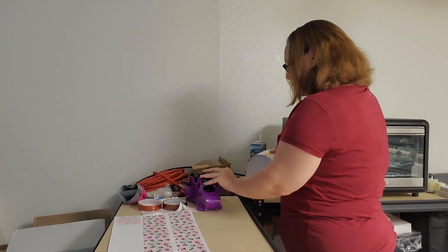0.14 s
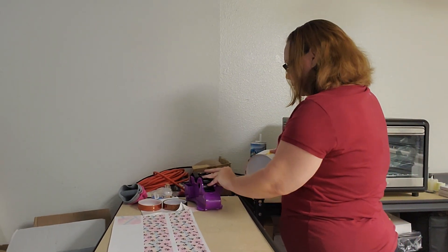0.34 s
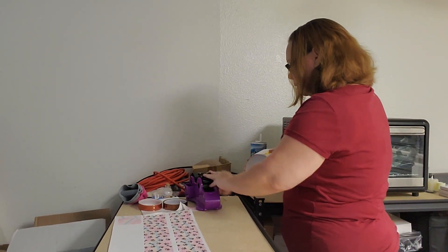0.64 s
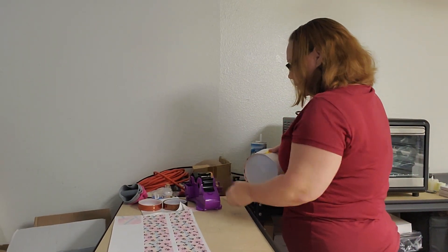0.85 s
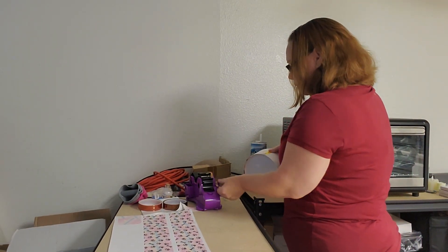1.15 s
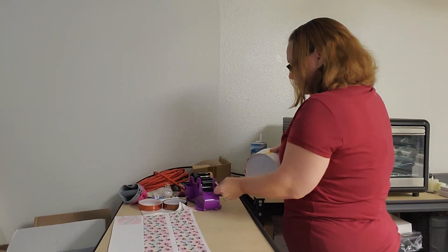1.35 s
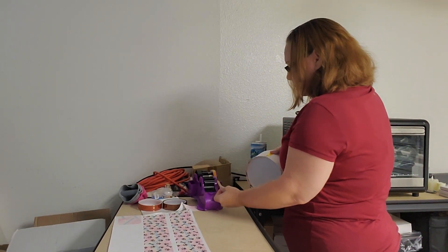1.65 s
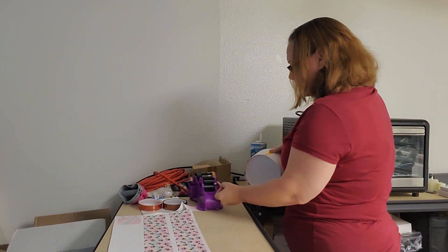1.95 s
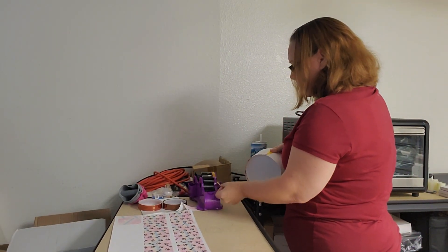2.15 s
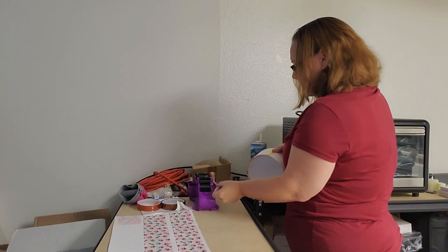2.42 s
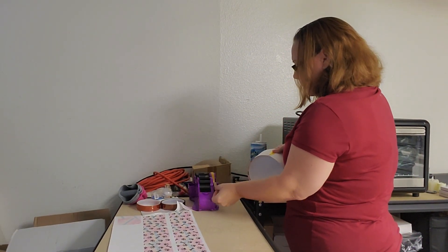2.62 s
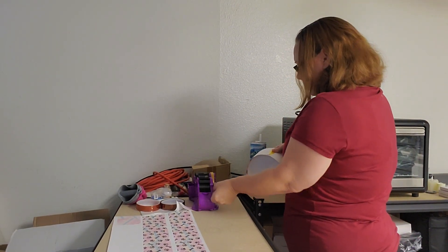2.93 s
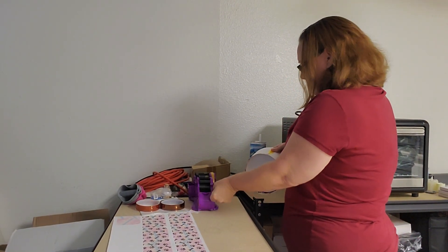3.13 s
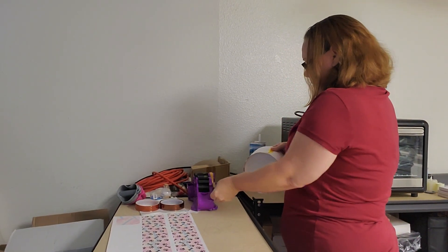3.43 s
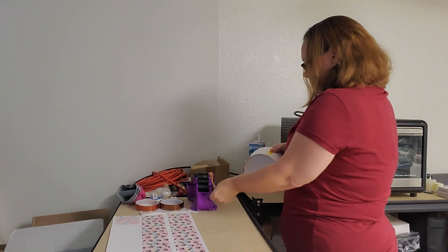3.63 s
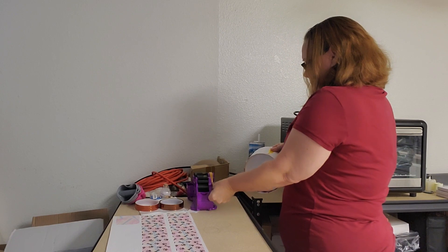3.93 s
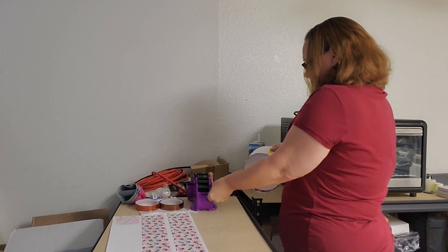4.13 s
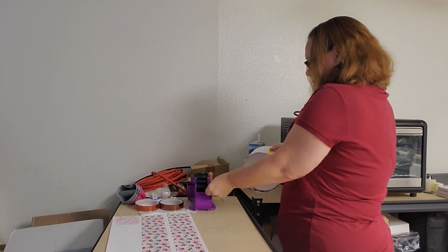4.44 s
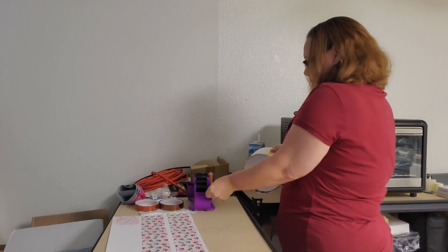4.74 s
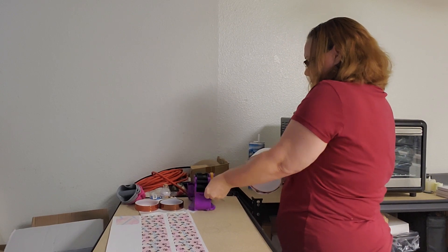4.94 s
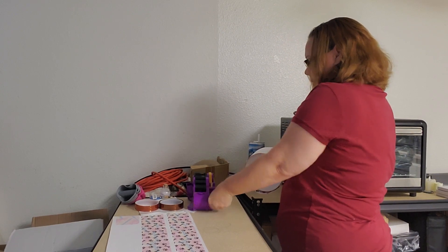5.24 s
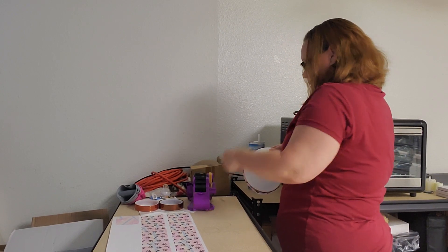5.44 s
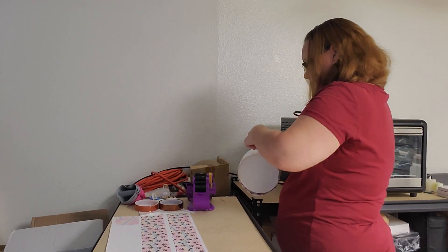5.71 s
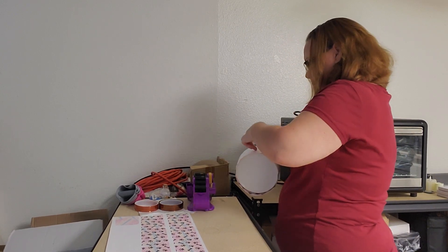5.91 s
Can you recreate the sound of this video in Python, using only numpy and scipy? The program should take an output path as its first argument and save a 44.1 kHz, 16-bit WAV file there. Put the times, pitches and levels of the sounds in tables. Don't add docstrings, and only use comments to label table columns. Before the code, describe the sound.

In a small hard room, a faint bowl ring fades, then tape peels with a short dry rasp, a tiny hub squeak and a quick tear. A longer, louder pull ends in a hard knock of the dispenser on the table. Soft handling ticks and paper rubs follow, then a crackling tear with sharp clicks. Phone microphone a couple of metres away; low hum and faint hiss.

```python
import sys
import numpy as np
from scipy import signal
from scipy.fft import rfft, irfft
from scipy.io import wavfile
from scipy.ndimage import uniform_filter1d

SR = 44100
rng = np.random.default_rng(int(sys.argv[2]) if len(sys.argv) > 2 else 0)


def linear_from_db(decibels):
    return 10 ** (np.asarray(decibels, float) / 20)


def dump(signal):
    limited = np.clip(np.atleast_2d(signal).T, -1, 1)
    pcm = np.round(limited * 32767).astype(np.int16)
    wavfile.write(sys.argv[1], SR, pcm)


N = 267854
HZ = np.fft.rfftfreq(270000, 1 / SR) + 1


def on_log(table, hz):
    f, value = np.array(table)[:, 0], np.array(table)[:, 1]
    return np.interp(np.log(hz), np.log(f), value)


def causal(gain):
    fold = irfft(np.log(gain + 1e-9))
    half = len(fold) // 2
    fold[1:half] *= 2
    fold[half + 1:] = 0
    return np.exp(rfft(fold))


def shape(x, gain):
    return irfft(rfft(x, 2 * len(HZ) - 2) * gain)[..., :N]


def unit(x):
    return x / np.sqrt(np.mean(x ** 2))


def bell(hz, centre_hz, width_hz):
    return 1 / np.sqrt(1 + ((hz ** 2 - centre_hz ** 2) / (hz * width_hz)) ** 2)


def split(hz, *edges_hz):
    below = [0 * hz] + [1 / (1 + (hz / edge) ** 6) for edge in edges_hz] + [1 + 0 * hz]
    return np.sqrt(np.diff(below, axis=0))


def walk(rate):
    hold = int(SR / rate)
    levels = rng.standard_normal(size=4096)
    steps = np.repeat(levels[:N // hold + 1], hold)
    return unit(uniform_filter1d(uniform_filter1d(steps, hold), hold)[:N])


def pan(x, db):
    return x * linear_from_db(np.array([[db], [-db]]) / 2)


# f/Hz, side minus mid level/dB
SIDE_SHARE = [(40, -9), (250, -10), (600, -3.5), (2000, 0), (5000, 0), (15000, 0)]


def ports(mid, side):
    return mid + shape(side, linear_from_db(on_log(SIDE_SHARE, HZ))) * np.array([[1], [-1]])


# f/Hz, rms level/dB
HUM = [(48.4, -59.5), (118.4, -67), (172.3, -82), (220.7, -79.5)]
# f/Hz, level per Hz/dB
FLOOR = [(25, -20.5), (45, -3.5), (75, 6), (110, -3.5), (160, -13), (230, -7.5), (320, -19.5), (500, -20.5),
         (800, -30.5), (1500, -36.5), (4000, -40), (8000, -50.5), (13000, -42.5), (16000, -40)]
FLOOR_DB = -63.5


def background():
    t = np.arange(N) / SR
    hum = 0
    for hz, db in HUM:
        level = linear_from_db(db + 2 + 0.36 * walk(2))
        hum = hum + level * np.sin(2 * np.pi * hz * t + 0.5 * walk(4))
    air = shape(rng.standard_normal((2, N)), linear_from_db(on_log(FLOOR, HZ)))
    return hum + linear_from_db(FLOOR_DB) * unit(ports(*air))


# f/Hz, t60/s
ROOM = [(60, 0.15), (250, 0.35), (1000, .3), (3000, 0.23), (8000, 0.3), (15000, 0.053)]
ROOM_DB = -6
TABLE_DB, TABLE_S = -5, 0.016
LATE_DB, LATE_T60_S = -32, 0.59


def room(lead_us, size=24576):
    t, hz = np.arange(size) / SR, np.fft.rfftfreq(size, 1 / SR) + 1
    noise = rfft(rng.standard_normal((2, size)))
    tail = 0
    for f in 50 * 2. ** np.arange(9):
        tail = tail + linear_from_db(-60 * t / on_log(ROOM, f)) * irfft(noise * bell(hz, f, 0.7 * f) ** 2)
    tail = unit(tail * (1 - np.exp(-t / 0.0015)))
    late = unit(irfft(noise[::-1] * bell(hz, 1000, 2000)) * linear_from_db(-60 * t / LATE_T60_S))
    bounces = rng.standard_normal((2, size)) * (rng.random((2, size)) < 0.15)
    early = unit(bounces * np.exp(-t / TABLE_S))
    answer = linear_from_db(ROOM_DB) * tail + linear_from_db(LATE_DB) * late + linear_from_db(TABLE_DB) * early
    mid, side = rfft(answer) / np.sqrt(size)
    delay_s = 8 / SR + 1e-6 * lead_us * np.array([[-0.5], [0.5]])
    direct = np.exp(-2j * np.pi * hz * delay_s)
    echo = direct + mid + side * linear_from_db(on_log(SIDE_SHARE, hz)) * np.array([[1], [-1]])
    even = uniform_filter1d(np.mean(abs(echo) ** 2, axis=0), size=110) ** -0.5
    return irfft(echo * causal(even)) * np.cos(np.pi / 2 * (t / t[-1]) ** 4) ** 2


# f/Hz, level/dB, t60/s
BOWL = [(2040, -67, 0.95), (2555, -58, .7), (2780, -64.5, 0.41), (3620, -52, 0.48), (4310, -70, 0.63),
        (5620, -59, .2)]
FADE_DB, FADE_T60_S = -51., 0.35


def bowl(size=16384):
    t, hz = np.arange(size) / SR, np.fft.rfftfreq(size, 1 / SR) + 1
    noise = rfft(rng.standard_normal((2, size)))
    ring = 0
    for f, db, t60 in BOWL:
        ring = ring + linear_from_db(db - 60 * t / t60) * unit(irfft(noise * bell(hz, f, 125.0) ** 2))
    tail = unit(irfft(noise[::-1] * (bell(hz, 7900, 12000) + 2.6 * bell(hz, 620, 350))))
    fading = ring + linear_from_db(FADE_DB - 60 * t / FADE_T60_S) * tail
    fading = fading * np.cos(np.pi / 2 * (t / t[-1]) ** 4)
    return np.pad(fading, ((0, 0), (0, N - size)))


# f/Hz, level/dB, t60/s
TINKLE = [(13450, -42, .22), (15050, -46, .2)]
TINKLE_S = 5.295


def tinkle():
    t = np.maximum(np.arange(N) / SR - TINKLE_S, 0)
    ring = 0
    for hz, db, t60 in TINKLE:
        ring = ring + linear_from_db(db - 60 * t / t60 + 3.0 * walk(150)) * np.sin(2 * np.pi * hz * t)
    return ring


# t/s, pitch f/Hz, level/dB
SQUEAK = [
    (0.505, 454.8, -46),
    (0.529, 427, -41),
    (0.549, 472.4, -45),
    (0.571, 459.6, -40),
    (0.6, 426, -58),
]
# multiple of the pitch, level/dB
SQUEAK_ORDERS = [(1, -4.5), (2, 1), (3, -16), (4, -2), (6, -11)]


def squeak():
    t, (s, hz, db) = np.arange(N) / SR, np.transpose(SQUEAK)
    pitch = np.interp(t, s, hz) * (1 + 0.012 * walk(300))
    phase = 2 * np.pi * np.cumsum(pitch) / SR
    gain = uniform_filter1d(linear_from_db(np.interp(t, s, db, -140, -140)), size=200)
    return linear_from_db(3.0) * gain * sum(linear_from_db(d) * np.sin(k * phase) for k, d in SQUEAK_ORDERS)


# t/s, peak level/dB, ring f/Hz, upper ring level/dB, crack level/dB
TICKS = [(0.449, -29.5, 2080, -16, -6), (0.744, -18, 1932, 6, -14), (0.788, -15.5, 1250, -6, -21.5),
         (1.422, -25.5, 1793, -14, -17.5), (3.004, -39.5, 2098, -8, -14.5), (3.274, -40, 1900, -3, -18),
         (3.437, -35, 1630, -14, -5.5), (3.463, -21.5, 1980, -11, -10.5), (3.585, -26.5, 1742, -4, -13.5),
         (3.731, -57, 1910, -16, -7), (4.048, -50, 1980, -9, 6), (4.514, -25, 2120, -20, -12),
         (4.581, -36, 1777, -30, -14), (5.073, -33, 1760, -22.5, -8.5), (5.13, -17, 1552, -8, -10),
         (5.185, -15, 1480, -20, -22), (5.36, -32.5, 1344, -11, -20)]
# t/s, peak level/dB, ring f/Hz, upper ring level/dB, crack level/dB
KNOCKS = [(0.199, -56.5, 769, -25, -17), (0.516, -32.5, 843, -15, -27.5), (0.849, -39.5, 690, -13, -19.5),
          (1.321, -54, 791, -10, -9), (1.507, -22.5, 1050, -13.5, -16), (1.996, -6.5, 780, -10, -19),
          (1.999, -8, 1300, -8, -25), (2.029, -16, 754, -8.5, -18.5), (2.409, -50, 833, -12, -15.5),
          (3.006, -50, 610, -20, -25), (2.935, -65, 624, -22, -19), (3.949, -70, 597, -26, -26),
          (4.16, -55, 900, -6, 0), (4.918, -52, 797, -5.5, -11), (4.939, -44, 936, -24, -15),
          (5.215, -21, 678, -13, -21.5), (5.235, -10.5, 772, -15, -19.5), (5.554, -64, 600, -9.5, -3.5),
          (5.779, -69, 759, -4, -27.5)]
# t/s, peak level/dB, ring f/Hz, upper ring level/dB, crack level/dB
BLADE_TICKS = [
    (0.338, -32.5, 1910, -16, -22),
    (3.061, -44, 1890, -11, -15),
    (4.25, -30, 1800, -9, -6),
]
TICK_UPPER_HZ, KNOCK_UPPER_HZ, BLADE_UPPER_HZ = 3110, 2500, 5900
CLICK_DB, CLICK_Q, CHATTER_MS, CLICK_BROAD_DB, THUMP_DB = -8, 9.3, 7.9, -22.5, -17.5


def clicks():
    out, size = np.zeros(N), 4096
    hz, t = np.fft.rfftfreq(size, 1 / SR) + 1, np.arange(size) / SR
    low, _, high = split(hz, 590, 3200)
    low = low * bell(hz, 190, 200) ** 2
    chatter = np.exp(-(1000 * t / CHATTER_MS) ** 3) * np.minimum(t / 0.00044, 1)
    rows = [(*row, TICK_UPPER_HZ) for row in TICKS]
    rows += [(*row, KNOCK_UPPER_HZ) for row in KNOCKS]
    rows += [(*row, BLADE_UPPER_HZ) for row in BLADE_TICKS]
    for s, db, ring_hz, upper_db, crack_db, upper_hz in rows:
        burst = rfft(rng.standard_normal(size) * chatter)
        modes = bell(hz, ring_hz, ring_hz / CLICK_Q)
        modes = modes + linear_from_db(upper_db + 2.5) * bell(hz, upper_hz, upper_hz / CLICK_Q)
        modes = modes + linear_from_db(-6.5) * bell(hz, ring_hz, 55.)
        modes = modes * hz / np.hypot(hz, ring_hz) + linear_from_db(CLICK_BROAD_DB) * bell(hz, 3600, 4000)
        parts = [irfft(burst * causal(gain)) for gain in (modes, low, high)]
        ring, thump, crack = (part / np.sqrt(np.mean(part[:440] ** 2)) for part in parts)
        thump = thump * linear_from_db(THUMP_DB) * (1000 / ring_hz) ** 2.3
        i = int(s * SR)
        out[i:i + size] += linear_from_db(db + CLICK_DB) * (ring + thump + linear_from_db(crack_db) * crack)
    return out


# t/s, effort level/dB, brightness level/dB
FIRST_PULL = [
    (0.455, -39.5, -0.5),
    (0.503, -50, -6.5),
    (0.513, -39, -16.5),
    (0.541, -42, -8.5),
    (0.582, -37, -6),
    (0.605, -31, 0),
    (0.68, -31.5, 2),
    (0.735, -47, 6),
]
FIRST_TEAR = [
    (0.755, -43, 7),
    (0.775, -44, 0.5),
    (0.8, -31, -7.5),
    (0.816, -43, -3),
    (0.832, -50, -5),
    (0.848, -36, -23),
    (0.88, -53, -20),
]
LONG_PULL = [
    (1.41, -57.5, -12),
    (1.42, -39, -4),
    (1.504, -31, -1),
    (1.592, -27, 0),
    (1.66, -27, 1),
    (1.8, -30, -3),
    (1.818, -34, -2),
    (1.89, -32, -3.5),
    (1.96, -57.5, -2.5),
]
LAST_TEAR = [
    (5.14, -35, -5),
    (5.156, -44, 0),
    (5.166, -32.5, -9),
    (5.183, -35, -8),
    (5.195, -29, -12),
    (5.239, -21, -13),
    (5.263, -27.5, -6),
    (5.361, -35.5, -16),
    (5.47, -66, -12),
]
# rumble, table boom, rasp, upper rasp, hiss,
# sizzle level/dB
PULL_COLOURS = [
    (-23, -12, 4.5, 3, -12, -8.5),
    (-16, -10, 3.5, -1, -6, -6),
    (-21, -27, 0.4, -0.3, -6.5, -9.5),
    (-15, -13, 1.5, -4, -9, -5),
]
# t/s, rise/s, fall per 20 dB/s, peak level/dB, brightness level/dB
SLIDES = [(0.02, .09, .16, -63, -28), (.36, .075, .03, -61, -5), (1.305, .07, .04, -62, -3),
          (2.255, .04, .12, -66, 10), (2.29, .08, .065, -58, 8), (2.46, .06, .2, -73, -20),
          (3.134, .035, .08, -67, 19), (3.2, .035, .045, -72, 18), (3.2, .07, .07, -62, -26),
          (3.424, 0.015, .06, -39.5, -8), (3.5, .05, .05, -62, 5), (3.85, .11, 0.2, -70.5, -30),
          (4.055, 0.024, .07, -69, -14), (4.39, .115, 0.02, -61, -4), (4.92, .025, 0.04, -56, -12),
          (4.62, 0.047, 0.3, -76, -5.5)]
# t/s, fall per 20 dB/s, level/dB, brightness level/dB, extra sizzle level/dB
RATTLES = [(0.0, .1, -74, 21.5, 5), (.2, 0.16, -71, -20, 0), (.343, .08, -53, -4, -2),
           (1.277, .1, -66, -24, 0), (2.008, 0.093, -20.5, -11, -3), (2.404, .05, -63, -4, 0),
           (3.01, .15, -56, -4, -2), (3.277, .1, -58, -16, 0), (3.47, .055, -40, -2, 1),
           (3.595, .036, -52, 2, -1), (4.05, .08, -73, 8, 16), (4.162, .12, -67, -8, 10),
           (4.256, .11, -69, 13, 14), (4.52, 0.0559, -53, 10, 2), (4.576, 0.0474, -46, -0.5, 2),
           (4.725, .1, -90, 10, 10), (4.94, .08, -62, 0, 12), (5.078, 0.0664, -47, 4, 2),
           (5.556, .15, -88, 8, 10)]
RATTLE_RISE_S = 0.005
# columns as for the pulls, level/dB
SLIDE_COLOUR = (-10, -3, 0.3, 0, -5, -4)
# columns as for the pulls, level/dB
RATTLE_COLOUR = (-24, -12, -1, 0, -2, -2)
BRIGHT_SHARE = (-.1, -.12, 0.39, 1.01, .9, .9)


def tint(colour, bright):
    bands_db = [c + k * bright for c, k in zip(colour, BRIGHT_SHARE)]
    return linear_from_db(np.array([0 * bright] + bands_db))


def contact():
    t, gains = np.arange(N) / SR, np.zeros((7, N))
    for rows, colour in zip((FIRST_PULL, FIRST_TEAR, LONG_PULL, LAST_TEAR), PULL_COLOURS):
        s, db, bright = np.transpose(rows)
        now = slice(int(s[0] * SR), int(s[-1] * SR))
        effort = linear_from_db(np.interp(t[now], s, db))
        gains[:, now] += effort * tint(colour, np.interp(t[now], s, bright))
    strokes = [(*row, SLIDE_COLOUR) for row in SLIDES]
    for s, fall, db, bright, sizzle in RATTLES:
        colour = (*RATTLE_COLOUR[:-1], RATTLE_COLOUR[-1] + sizzle)
        strokes.append((s, RATTLE_RISE_S, fall, db, bright, colour))
    for s, rise, fall, db, bright, colour in strokes:
        i = int(s * SR)
        since = t[:min(SR, N - i)]
        fading = linear_from_db(db - 20 * np.maximum(since - rise, 0) / fall)
        swell = np.minimum(since / rise, 1) ** 1.5 * fading
        gains[:, i:i + SR] += tint(colour, bright)[:, None] * swell
    return uniform_filter1d(gains, size=200)


# f/Hz, level per Hz/dB
PEEL = [(24, -37), (40, 0.5), (172, -10.5), (226, -14), (469, -9.5), (519, -15.5), (684, -4.5),
        (1530, -8.5), (2120, -8), (2860, -9), (4390, -12.5), (8020, -13.5), (9320, -8), (15000, -6.5),
        (16200, -12)]
# f/Hz, width f/Hz, level/dB (all are driven alike)
SHELL = [(1790, 79, 0), (2050, 47, 0), (3120, 45, -2), (4450, 78, -5), (5140, 61, -7), (5960, 28, -10),
         (6830, 99, -10), (9500, 96, -11), (11500, 53, -14), (15790, 61, -14)]
SHELL_DB, GRAIN_DB = -4.5, 1.3


def rubs():
    slips = rng.standard_normal(N) * (rng.random(N) < 0.3) * linear_from_db(GRAIN_DB * rng.exponential(size=N))
    shell = 1 + linear_from_db(SHELL_DB) * sum(bell(HZ, hz, 1.2 * width + 0.03 * hz) for hz, width, _ in SHELL)
    voice = causal(linear_from_db(on_log(PEEL, HZ)) * shell)
    bands = shape(slips, voice * split(HZ, 45, 130, 500, 1600, 3300, 5700, 10500)[1:])
    rumble, low, body, *upper = (unit(band) * linear_from_db(1.4 * walk(110)) for band in bands)
    hesitation = linear_from_db(-5.0 + 1.3 * walk(260) + 0.46 * walk(30))
    return hesitation * np.sum(contact() * [body, rumble, low, *upper], axis=0)


SPOTS, SPOT_S = 3, 0.1
LEFT_LEAD_US, LEAD_SPREAD_US, PAN_DB = 40., 25., -0.36


def scene():
    hands = rubs() + clicks() + squeak() + tinkle()
    size = 2 * len(HZ) - 2
    place, heard = np.arange(N) / SR / SPOT_S, 0
    for spot in range(SPOTS):
        away = abs((place - spot + SPOTS / 2) % SPOTS - SPOTS / 2)
        share = np.cos(np.pi / 2 * np.clip(away, 0, 1))
        answer = room(LEFT_LEAD_US + LEAD_SPREAD_US * (spot - 1))
        heard = heard + rfft(share * hands, size) * rfft(answer, size)
    return pan(irfft(heard)[:, :N], PAN_DB) + bowl() + background()


def band_limit(x):
    return signal.sosfilt(signal.butter(12, 16800, fs=SR, output="sos"), x)


TOP_HZ, TOP_DB, RIGHT_TOP_DB = 16000, -28, -5.


def record(dry):
    top = 1 / (1 + (11000 / HZ) ** 8)
    cut = linear_from_db(TOP_DB * (HZ > TOP_HZ)) / np.sqrt(1 + (40 / HZ) ** 8)
    balance = linear_from_db(np.outer([-0.5, 0.5], RIGHT_TOP_DB * top))
    mix = shape(dry, cut * balance)
    return band_limit(mix)


dry = scene()
out = record(dry)
dump(out)
```